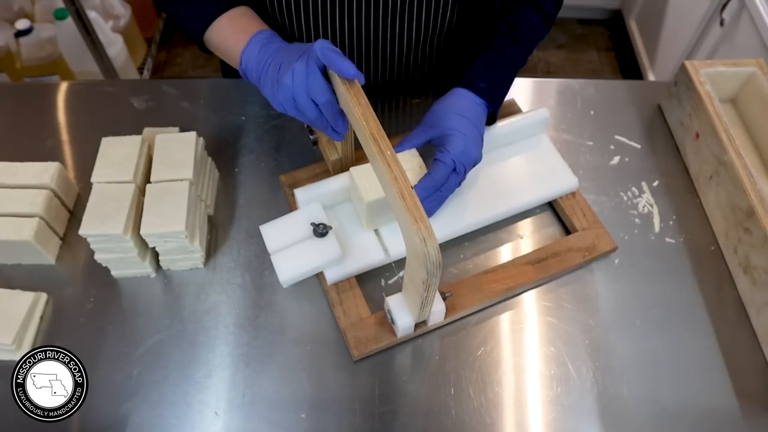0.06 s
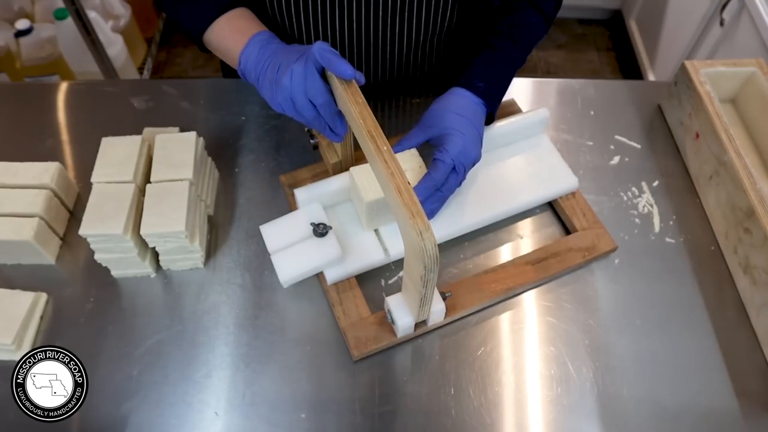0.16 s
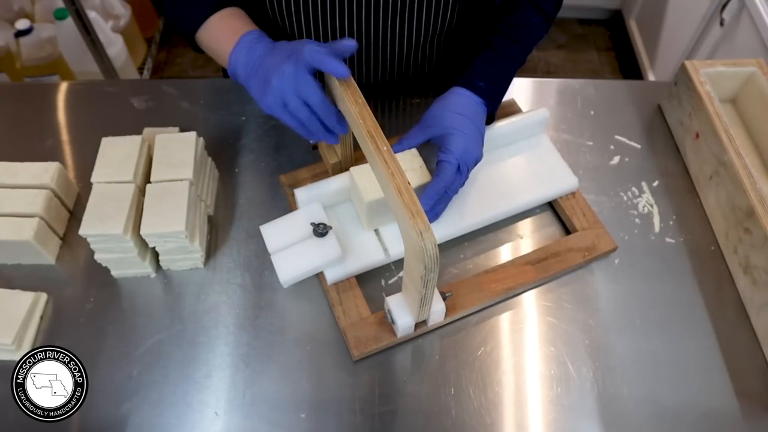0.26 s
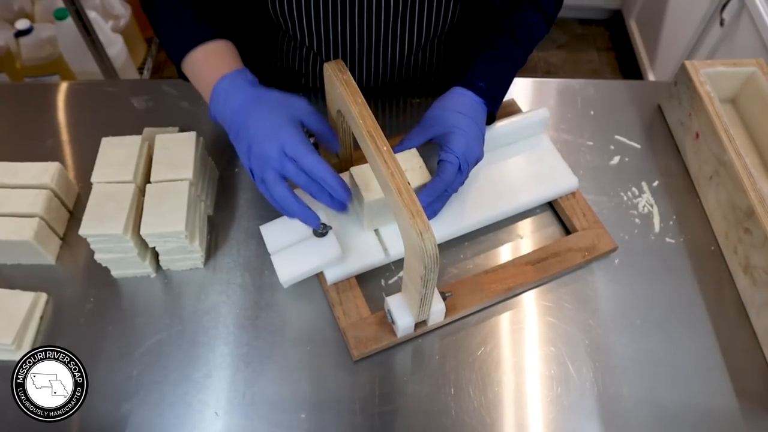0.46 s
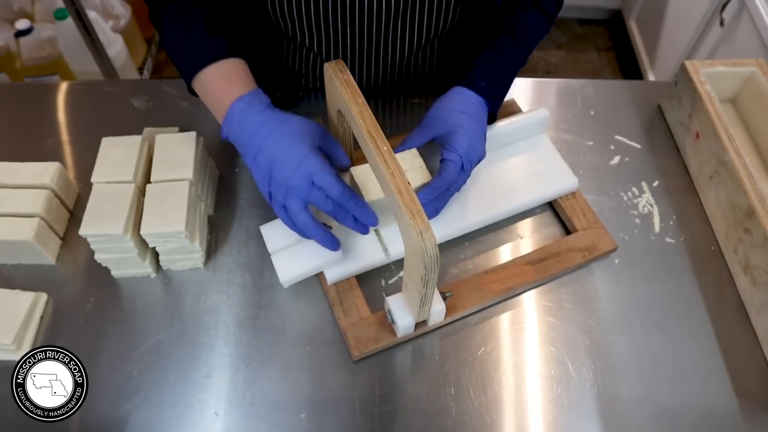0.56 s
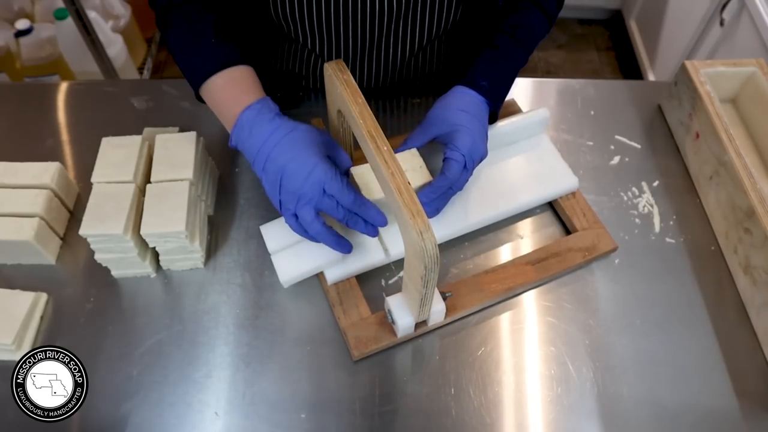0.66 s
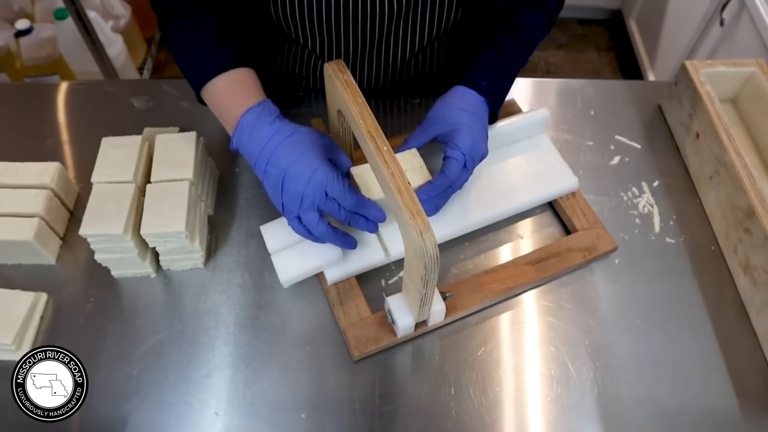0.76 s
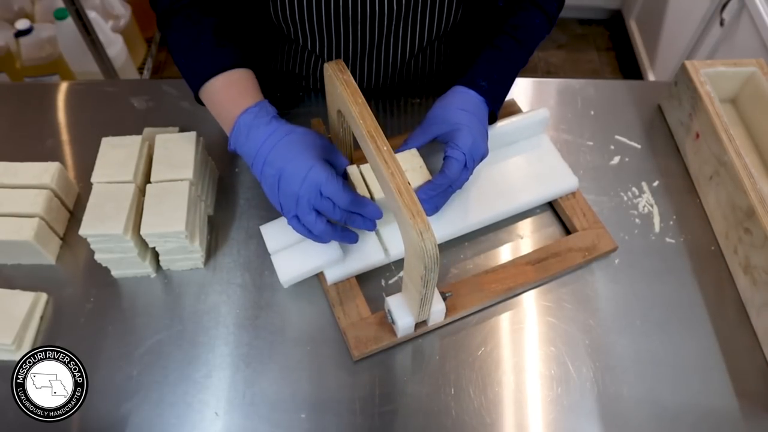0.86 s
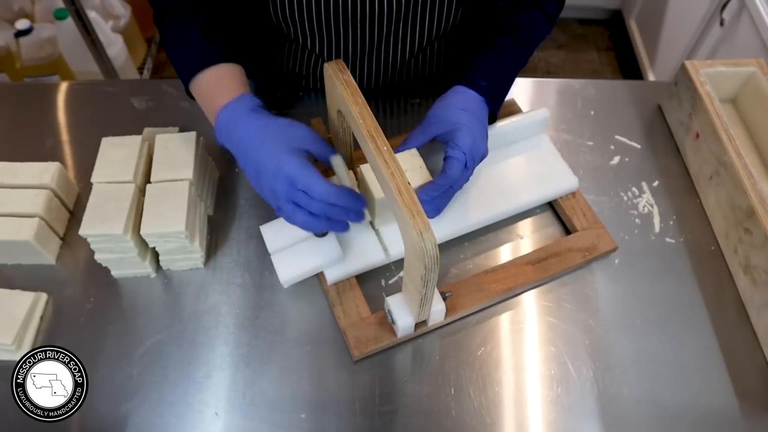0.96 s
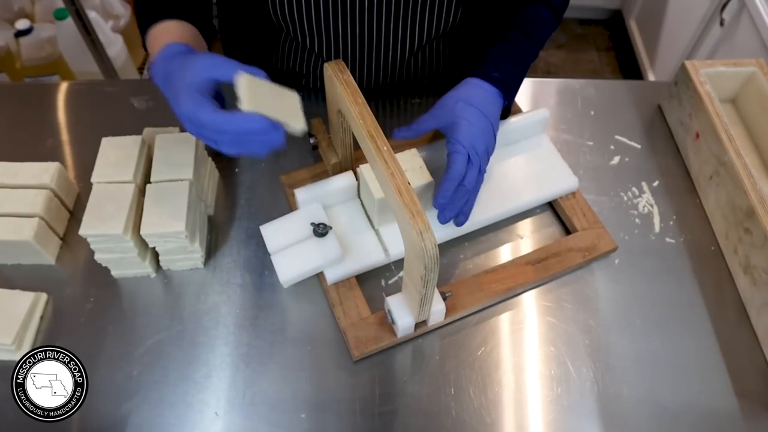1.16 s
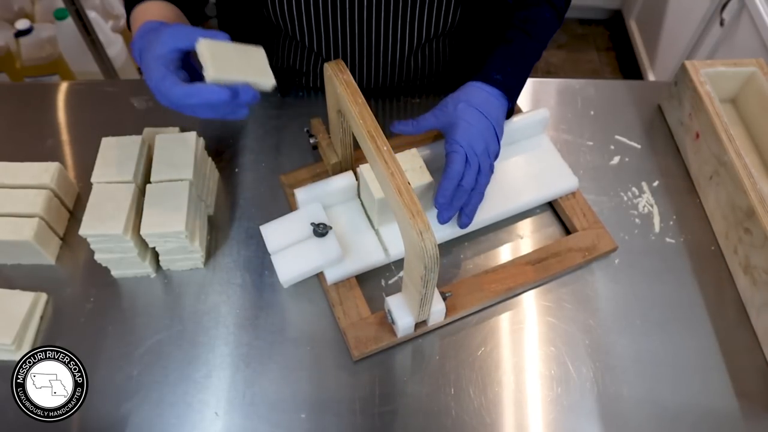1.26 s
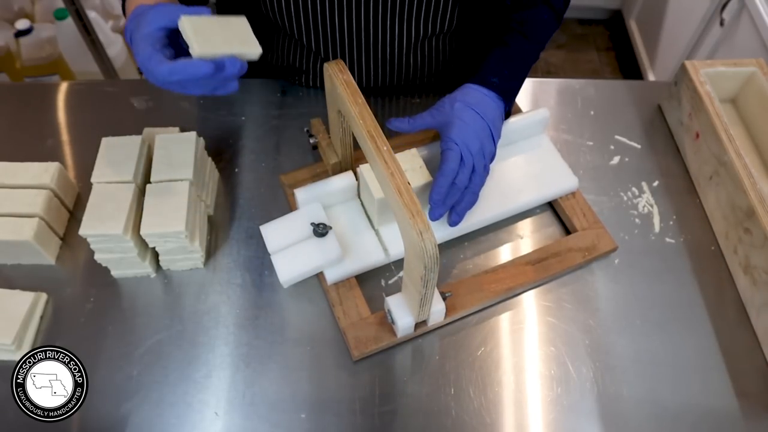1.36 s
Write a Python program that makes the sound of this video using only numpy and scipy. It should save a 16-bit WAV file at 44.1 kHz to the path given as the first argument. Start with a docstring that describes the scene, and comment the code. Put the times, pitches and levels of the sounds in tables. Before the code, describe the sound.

A wooden cutter arm slams down on a steel table, which rings briefly.

```python
"""In a small workroom, a wire soap cutter stands on a steel table and a fan hums.
The pressed cutter groans softly, the wire ticks out of the loaf, and the wooden arm slams onto
its stop in a quick double blow. The table top and the room ring on, while an automatic volume
control dips and recovers. Then gloved hands slide the cut bar out."""
import sys
import numpy as np
from scipy import signal
from scipy.fft import rfft, irfft, next_fast_len
from scipy.io import wavfile
from scipy.ndimage import map_coordinates

SR = 44100
rng = np.random.default_rng(int(sys.argv[2]) if len(sys.argv) > 2 else 0)


def generate_wav(sig):
    """Save sig (samples, or channels by samples) to the path in sys.argv[1] as 16-bit PCM at SR."""
    pcm = np.round(np.clip(np.atleast_2d(sig).T, -1, 1) * 32767).astype(np.int16)
    wavfile.write(sys.argv[1], SR, pcm)


N = 61739


def amp(db):
    """Turn decibels into a multiplier."""
    return 10 ** (np.asarray(db) / 20)


def unit(x):
    """Scale a sound to an average (rms) level of 1."""
    return x / np.sqrt(np.mean(x ** 2) + 1e-20)


def along(points, hz):
    """Read a curve of (pitch, value) points, with octaves evenly spaced."""
    pitches, values = np.transpose(points)
    return np.interp(np.log(hz + 1), np.log(pitches + 1), values)


def since(start_s):
    """Seconds since the start, zero before it."""
    return np.maximum(np.arange(N) / SR - start_s, 0)


def fade(t, fade_s):
    """Die away by 60 dB every fade_s seconds."""
    return np.exp(-np.log(1000) * t / fade_s)


def strike(start_s, rise_s, fade_s):
    """The loudness of a hit: it rises, then dies away."""
    t = since(start_s)
    return (1 - np.exp(-t / rise_s)) * fade(t, fade_s)


def wobble(rate_hz):
    """A smooth curve through rate_hz random values a second."""
    return map_coordinates(rng.standard_normal(256), [np.arange(N) * rate_hz / SR], mode="wrap")


def filtered(x, response):
    """Turn each pitch in x up or down by response(hz)."""
    size = next_fast_len(N + SR // 2)
    return irfft(rfft(x, size) * response(np.fft.rfftfreq(size, 1 / SR)), size)[:N]


def noise(colour):
    """Noise at level 1; its colour says how strong the pitches are next to each other."""
    return unit(filtered(rng.standard_normal(N), lambda hz: amp(along(colour, hz))))


def ring(tones, start_s, rise_s):
    """The fading tones of a struck object; neighbours swing opposite ways."""
    t = since(start_s)
    return sum((-1) ** k * amp(db) * strike(start_s, rise_s, fade_s) * np.sin(2 * np.pi * hz * t)
               for k, (hz, db, fade_s) in enumerate(tones))


# Rush of the fan's air: pitch_hz, relative_db
AIR_COLOUR = [(25, -1.5), (50, -18), (75, -13.5), (130, -9), (200, -6), (270, -9.5), (400, -10.5),
              (540, -11), (650, -15), (900, -18), (2400, -22.5), (6000, -26), (9000, -28), (15500, -31)]
# Tones of the fan's hum: pitch_hz, level_db
HUM_TONES = [(76, -69.5), (120, -58.5), (532, -61.5), (559, -62.5)]

def fan():
    """A fan blows steadily and hums with a slight waver."""
    hum = 0
    for pitch_hz, level_db in HUM_TONES:
        peak = amp(level_db + 0.6 * wobble(14.6)) * np.sqrt(2)
        hum += peak * np.sin(2 * np.pi * pitch_hz * since(0) + .5 * wobble(20))
    return amp(-53.5) * noise(AIR_COLOUR) + hum


# Soap rubbing on glove and cutter bed: pitch_hz, relative_db
RUB_COLOUR = [(200, -5), (600, 7), (1500, 2), (3000, 1.5), (5000, -0.5), (8300, 3), (11000, -8.5),
              (15000, -8)]
# Soft bumps of the hands on the cutter: start_s, level_db
BUMPS = [(0.888, -46), (.945, -49), (1.058, -48), (1.128, -54)]
# Dull sound of one bump: pitch_hz, relative_db
BUMP_COLOUR = [(35, -20), (75, 0), (100, -7), (150, 3.5), (300, -15), (600, -26), (1500, -44),
               (5000, -49.5)]

def hands():
    """Hands bump the frame and slide the bar out with an uneven rub."""
    start_s, peak_s, end_s = .95, 1.18, 1.43
    stroke = np.interp(since(0), [start_s, peak_s, end_s], [0, 1, 0])
    rub = amp(-59 + 1.5 * wobble(34.04)) * stroke * noise(RUB_COLOUR)
    bumps = sum(amp(level_db) * noise(BUMP_COLOUR) * strike(bump_s, rise_s=0.00545, fade_s=.25)
                for bump_s, level_db in BUMPS)
    return rub + bumps


# Small ticks and taps: start_s, level_db, pitch_hz, fade_s
SMALL_TICKS = [(0.059, -56, 4470, 0.013), (.1357, -27.5, 2360, 0.0033), (0.1359, -33.5, 6660, 0.0067),
               (.1385, -52, 3800, 0.034), (0.491, -60, 8170, 0.19), (0.532, -52, 7840, .035),
               (0.557, -49, 3020, .02), (.696, -49.5, 4000, 0.0095), (.801, -54, 1900, 0.012),
               (1.053, -53, 1400, 0.057), (1.135, -50, 530, 0.055), (1.296, -56.5, 5020, 0.066)]

def ticks(width_octaves=0.664):
    """Wire, soap and fingers make tiny snaps, each a burst of noise around one pitch."""
    out = np.zeros(N)
    for start_s, level_db, pitch_hz, fade_s in SMALL_TICKS:
        band = lambda hz: 1 / (1 + (np.log2((hz + 1) / pitch_hz) / width_octaves) ** 2) ** 2
        hiss = unit(filtered(rng.standard_normal(N), band))
        out += amp(level_db) * hiss * strike(start_s, .0001, fade_s)
    return out


# Low groan of the cut: pitch_hz, relative_db
GROAN_COLOUR = [(40, -17), (130, -10.5), (175, -7.5), (205, 3.5), (250, -10), (360, -18.5), (600, -26),
                (1200, -43)]

def cutting(slam_s):
    """The pressed cutter groans softly, fading once the arm lands."""
    return amp(-47) * noise(GROAN_COLOUR) * fade(since(slam_s), fade_s=.3)


# Echo of the room: pitch_hz, relative_db
ECHO_COLOUR = [(40, -18.5), (100, -18.5), (140, 5), (350, -0.5), (600, 1), (900, -3), (1130, 1),
               (1400, -7.5), (2200, -10), (2700, -11.5), (4000, -10.5), (4750, -20.5), (5350, -14.5),
               (6500, -23), (7500, -25), (11000, -30.5), (15500, -36)]
# How long the echo lasts: pitch_hz, fade_s
ECHO_FADES = [(100, 0.5), (500, 0.48), (2000, 0.53), (4000, 0.49), (5400, 0.51), (9000, 0.41),
              (15000, 0.31)]

def room_echo(slam_s, rise_s=0.0048):
    """The room answers the slam with a wash of noise; each pitch dies at its own speed."""
    hz, t, bands = signal.stft(noise(ECHO_COLOUR), SR, nperseg=256)
    fading = fade(np.maximum(t - slam_s, 0), along(ECHO_FADES, hz)[:, None])
    tail = signal.istft(bands * fading, SR)[1][:N]
    swell = 1 - np.exp(-since(slam_s) / rise_s)
    return amp(-6.5) * tail * swell


# Tones of the steel table top: pitch_hz, relative_db, fade_s
STEEL_TONES = [(75, -4.5, 0.48), (145.15, 2, 0.49), (167.6, -14, 0.8), (234.5, -8.5, 0.98),
               (281.1, 7, 0.53), (311, -23, 1), (395, 2, 0.57), (422.6, -5, 0.38), (450.6, -0.5, 0.34),
               (567, -27, 0.18), (746, -18, 0.84), (976, -13, 0.17), (980, -20, .5), (1077, -10.5, 0.63),
               (1160, -7, .42)]

def steel_table(slam_s):
    """The steel top takes up the slam and rings on."""
    return amp(-15) * ring(STEEL_TONES, slam_s, rise_s=0.027)


# Low tones of the wooden frame: pitch_hz, relative_db, fade_s
FRAME_TONES = [(178.4, 4.5, 0.12), (304, -10, .06), (448.4, -5, 0.03), (652, -1.5, 0.081), (753, -2, .06),
               (1020, -10, 0.04), (1153, -3.5, 0.12)]
# High tones of the wooden arm: pitch_hz, relative_db, fade_s
ARM_TONES = [(1480, -17, .05), (1836, -8, 0.034), (2007, -9, 0.055), (2086, -9.5, 0.032), (2247, -6, 0.048),
             (2484, -4.5, .028), (3005, -5, 0.024), (3558, -9.5, .025), (3930, -14, .022),
             (4430, -10, 0.027), (5900, -16, 0.024), (6960, -13, 0.022), (8730, -16.5, 0.027)]
# Sharp crack of one hit: pitch_hz, relative_db
CRACK_COLOUR = [(40, -20), (200, -8), (1000, -4), (2600, 1.5), (4000, 0), (4800, -10.5), (6500, -5),
                (9000, -9), (15000, -12.5)]
# Hits of the arm on its stop, in two close groups: start_s, clack_db, crack_db, brightness_hz
ARM_HITS = [(0.2158, -30, -21.5, 2990), (0.2165, -17, -3, 14020), (0.2185, -11, -6, 9115),
            (0.2252, -4, -5, 5000), (0.2263, 1, -3.5, 5954)]

def arm_slam(contact_s=0.00023):
    """The frame thuds once; each hit makes the arm clack and adds a crack of noise."""
    out = amp(-10) * ring(FRAME_TONES, start_s=.2168, rise_s=contact_s)
    for start_s, clack_db, crack_db, brightness_hz in ARM_HITS:
        clack = ring(ARM_TONES, start_s, contact_s)
        hiss = filtered(noise(CRACK_COLOUR), lambda hz: 1 / np.hypot(1, hz / brightness_hz))
        crack = hiss * strike(start_s, contact_s, fade_s=.016)
        out += amp(clack_db) * clack + amp(crack_db) * crack
    return out


def scene():
    """All the sounds meet at one microphone above the table."""
    slam_s = ARM_HITS[0][0]
    impact = arm_slam() + steel_table(slam_s) + room_echo(slam_s)
    return (impact + cutting(slam_s) + ticks() + hands() + fan())[None]


def volume_control(x, threshold_db, depth_db, attack_s, hold_s, release_db_per_s):
    """Loud sound pulls the volume down, a little late; it is held, then climbs back."""
    t = since(0)
    power = signal.lfilter([1 / 128], [1, 1 / 128 - 1], x ** 2)  # running average over about 3 ms
    excess_db = np.clip(10 * np.log10(np.abs(power) + 1e-12) - threshold_db, 0, depth_db)
    climb_db = release_db_per_s * t
    dip_db = np.maximum.accumulate(excess_db + climb_db) - climb_db
    held_db = np.maximum(dip_db, np.interp(t - hold_s, t, dip_db))
    lag = np.exp(-1 / (attack_s * SR))
    return x * amp(-signal.lfilter([1 - lag], [1, -lag], held_db))


def record(dry, low_cut_hz=42, top_hz=15900):
    """Trim the rumble, turn down loud moments, clip the peaks and drop the highest treble."""
    mic = signal.sosfilt(signal.butter(2, low_cut_hz, "high", fs=SR, output="sos"), dry[0])
    ducked = volume_control(mic, threshold_db=-13, depth_db=15,
                            attack_s=0.015, hold_s=0.011, release_db_per_s=173)
    return filtered(np.clip(ducked, -1, 1), lambda hz: hz < top_hz)[None]


dry = scene()
out = record(dry)
generate_wav(out)
```